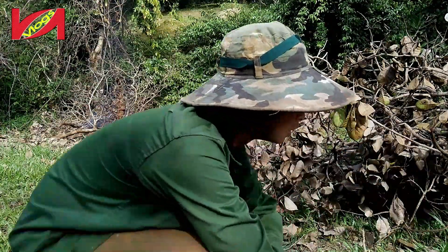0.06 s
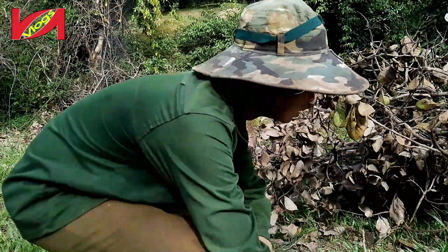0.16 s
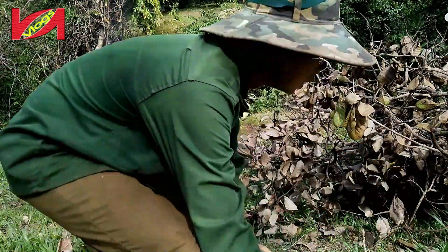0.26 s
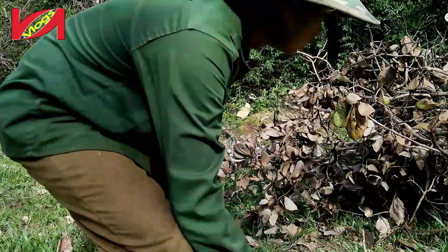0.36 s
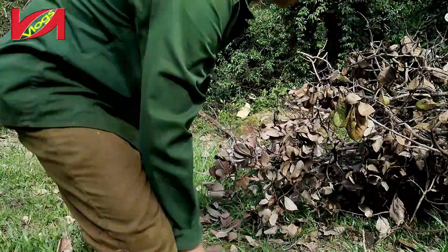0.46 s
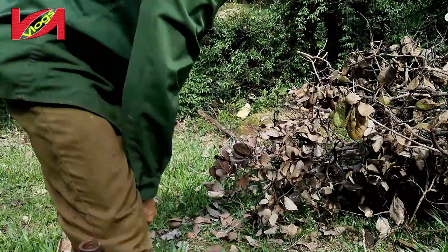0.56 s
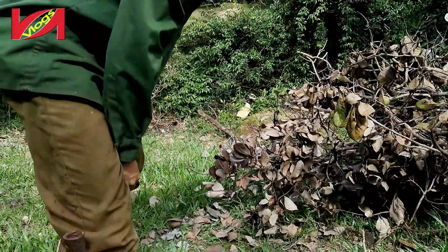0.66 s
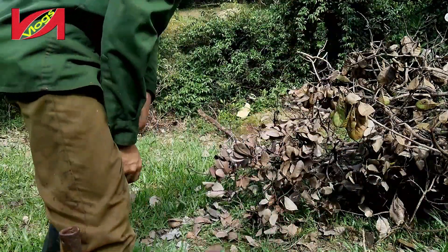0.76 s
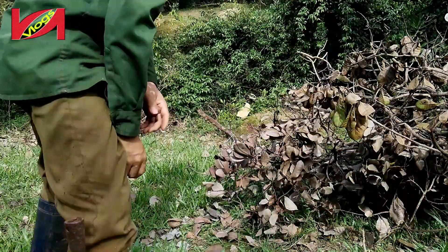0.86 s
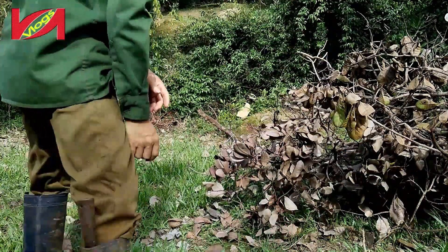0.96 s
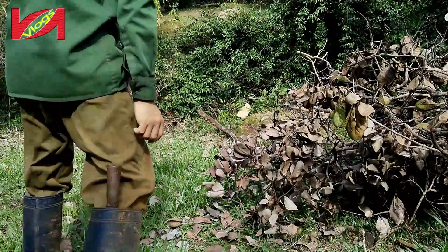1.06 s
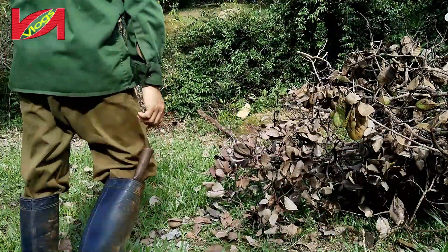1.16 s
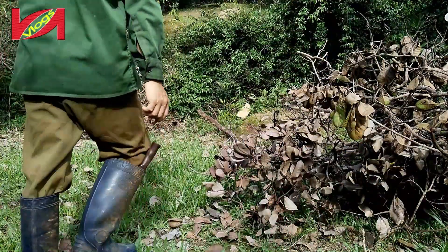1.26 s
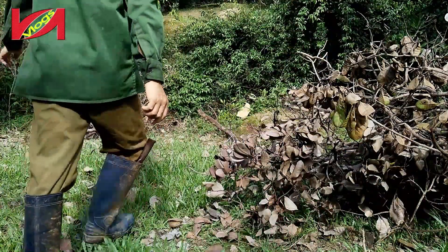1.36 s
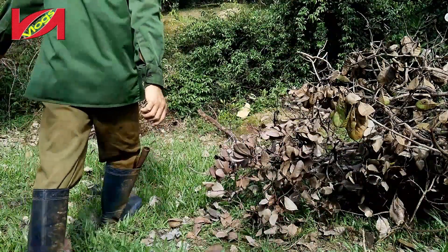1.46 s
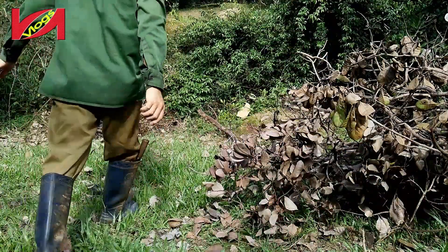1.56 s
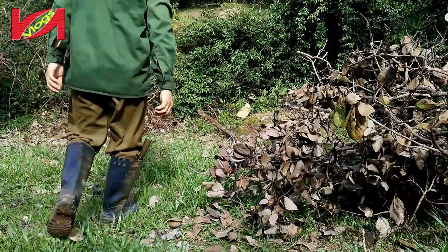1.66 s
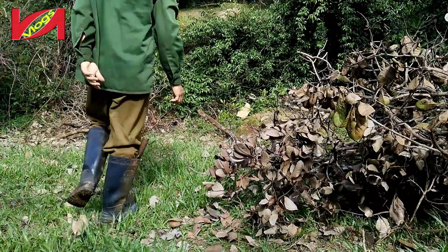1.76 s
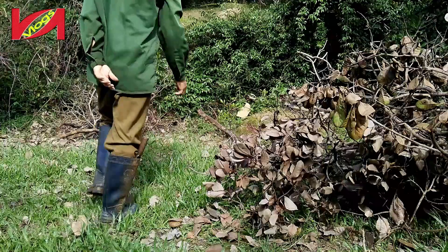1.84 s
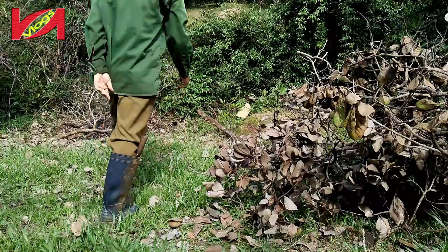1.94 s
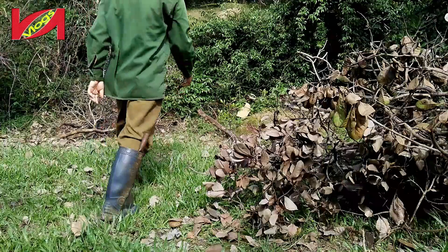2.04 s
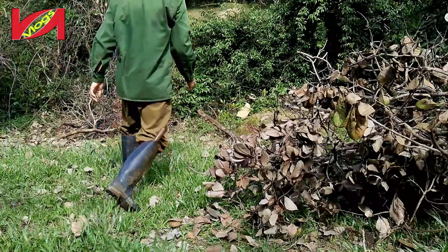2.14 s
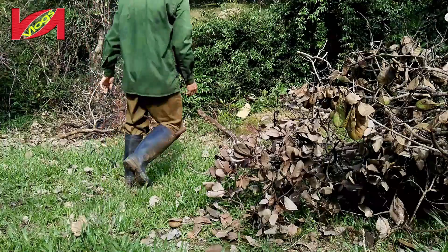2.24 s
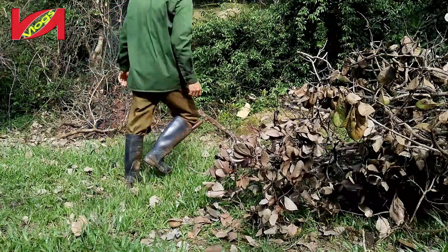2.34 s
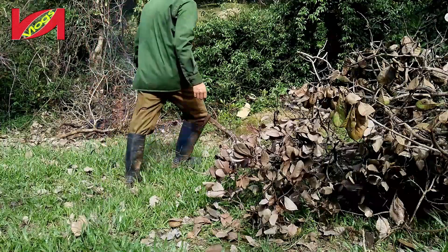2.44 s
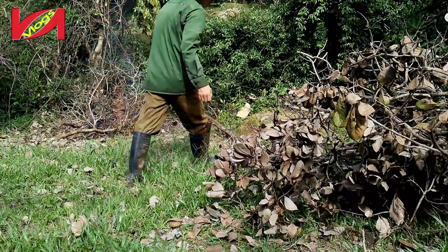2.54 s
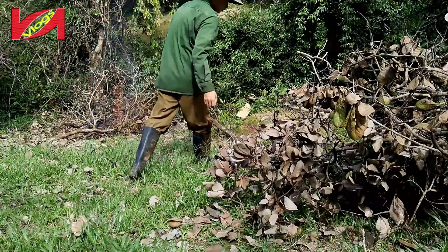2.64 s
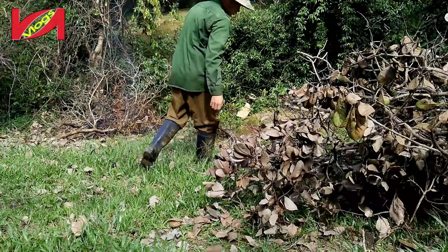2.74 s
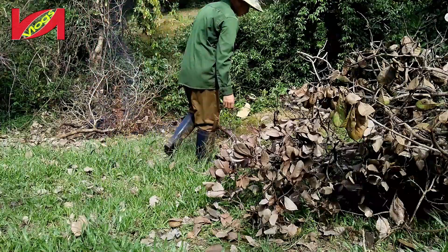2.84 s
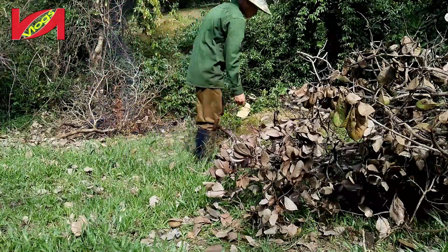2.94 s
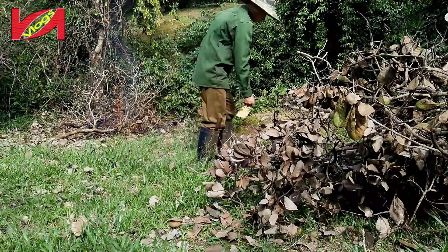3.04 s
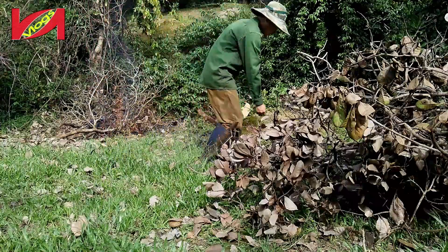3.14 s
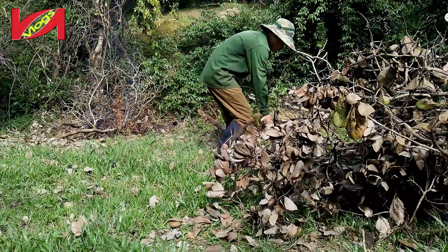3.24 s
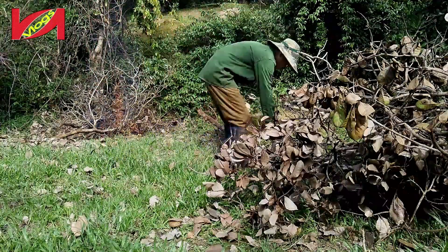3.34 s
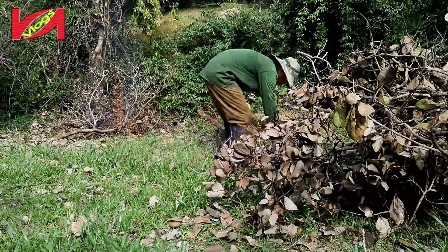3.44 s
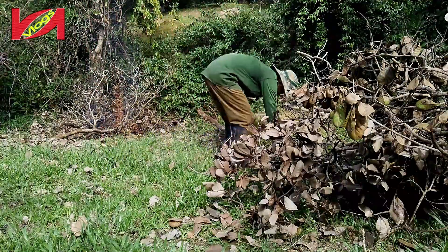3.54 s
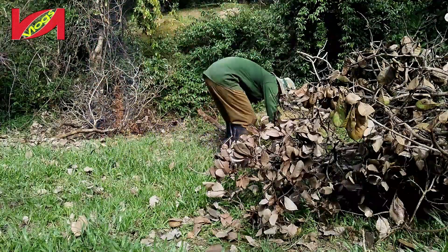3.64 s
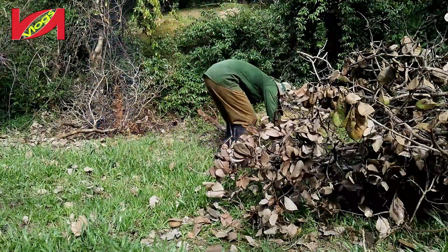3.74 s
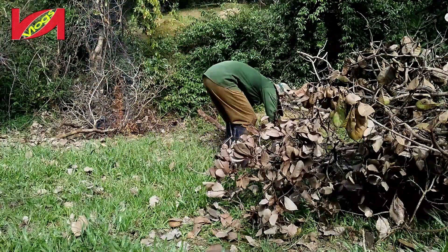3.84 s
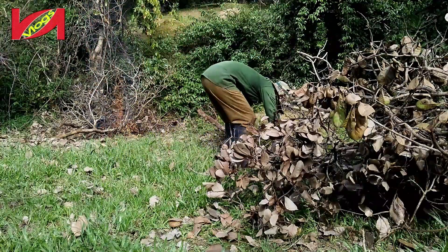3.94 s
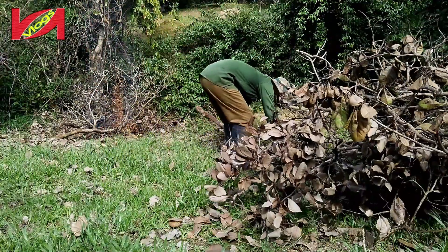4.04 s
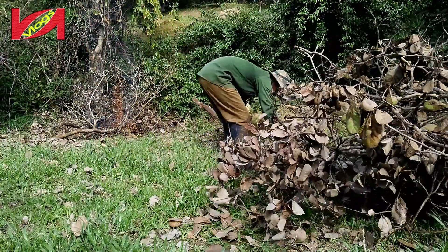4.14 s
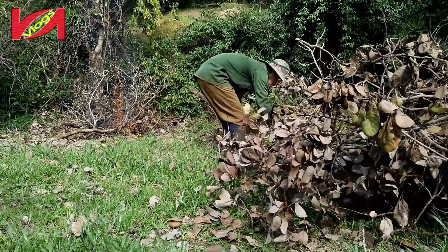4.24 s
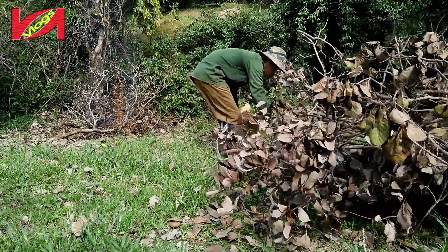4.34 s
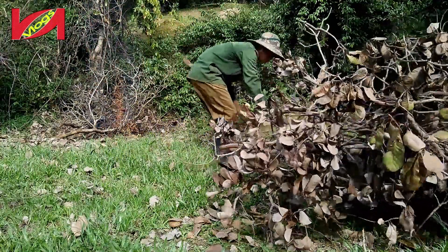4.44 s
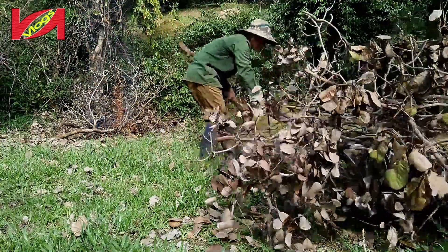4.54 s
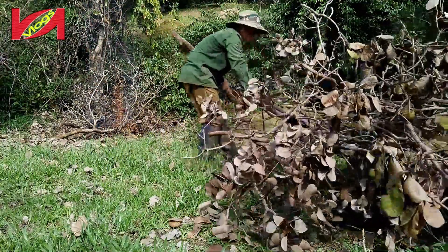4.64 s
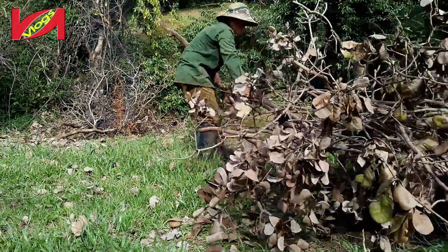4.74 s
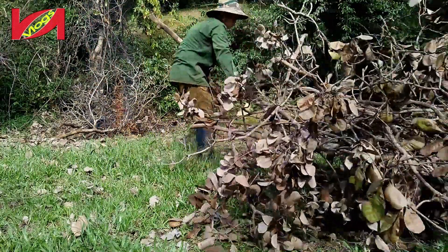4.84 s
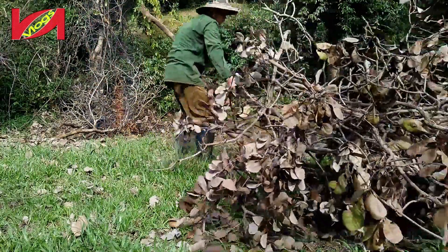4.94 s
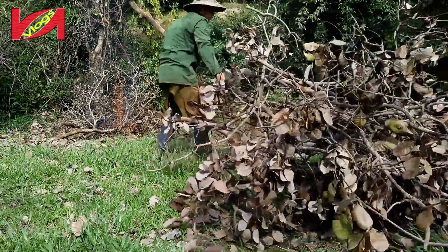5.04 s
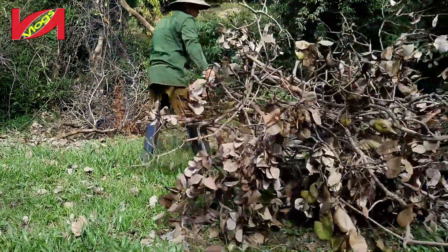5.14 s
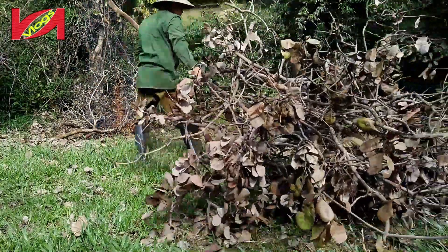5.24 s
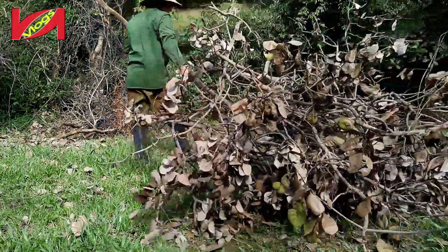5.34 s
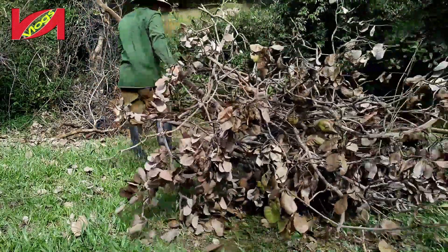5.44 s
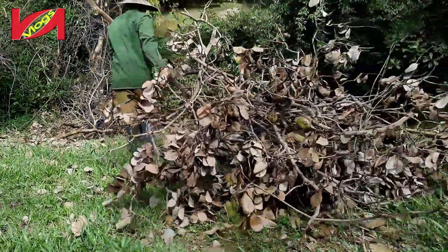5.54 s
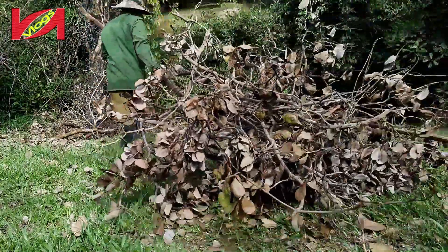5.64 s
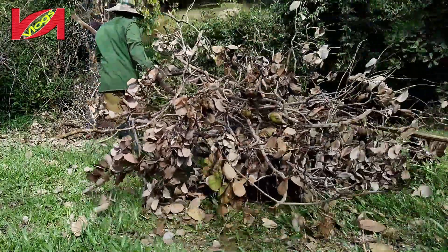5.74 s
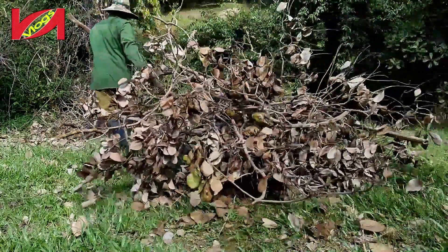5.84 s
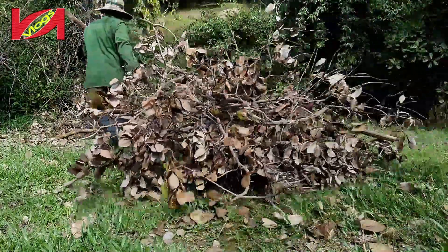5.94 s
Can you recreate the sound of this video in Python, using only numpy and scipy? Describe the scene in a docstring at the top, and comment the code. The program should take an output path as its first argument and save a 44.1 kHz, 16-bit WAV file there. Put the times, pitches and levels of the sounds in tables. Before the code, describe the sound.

Soft boot steps on grass, then dry leaves crackle and twigs snap loudly as a heap of branches is dragged, over faint bird chirps.

```python
"""First you hear a small bird repeating one chirp over a faint band of insects in a quiet orchard.
A worker in rubber boots walks over the grass: blades crackle, stems crunch and the soil thuds.
The worker takes hold of a heap of cut branches and drags it away, the loudest part of the scene.
Dry leaves crackle in dense clumps, twigs snap and splinter, and the boughs scrape over the ground."""
import sys
import numpy as np
from scipy import signal
from scipy.fft import rfft, irfft, next_fast_len
from scipy.io import wavfile
from scipy.ndimage import uniform_filter1d

SR = 44100
rng = np.random.default_rng(int(sys.argv[2]) if len(sys.argv) > 2 else 0)


def put_to_file(sound):
    """Save the sound as 16-bit audio at rate SR, in the file named by the first command-line argument."""
    columns = np.atleast_2d(sound).T  # one column per channel
    safe = np.clip(columns, -1, 1)
    whole_steps = np.round(safe * 32767)
    wavfile.write(sys.argv[1], SR, whole_steps.astype(np.int16))


N = 264159
TIME = np.arange(N) / SR

# The steady pull on the heap. Each row: time in seconds, rustle level in dB.
STEADY_DRAG = [(4.2, -56), (4.224, -48), (4.34, -41), (4.42, -46.5), (4.68, -40), (4.92, -37),
               (5.15, -30.5), (5.27, -24.5), (5.43, -27), (5.62, -23.5), (5.76, -32), (5.99, -28)]
# Tugs that shake the whole heap. Each row: peak time in seconds, rustle level in dB, fade in seconds.
HEAP_TUGS = [(4.454, -28.5, 0.0081), (4.527, -37, 0.045), (4.663, -22.5, 0.02), (4.777, -29, 0.049),
             (4.906, -29.5, 0.0066), (4.959, -27, 0.017), (5.029, -25, 0.022), (5.093, -25.5, 0.039),
             (5.315, -27, .022), (5.49, -22.5, 0.017), (5.704, -23.5, 0.014), (5.91, -26, 0.011)]
# The tone of dry leaves. Each row: frequency in Hz, level in dB.
LEAF_TONE = [(60, -25), (250, -21), (700, -13.5), (1800, -10), (3500, -5.5), (5000, -4), (7000, -7.5),
             (8800, -16), (10000, -18.5), (12300, -25.5), (14000, -38)]
# The low tone of boughs on the ground. Each row: frequency in Hz, level in dB.
SCRAPE_TONE = [(15, -46), (28, -25), (45, -4), (75, -1.5), (130, -4.5), (220, -5.5), (600, -5.5),
               (1200, -20.5), (3000, -32.5)]


def dragged_heap(wash_db=-2, crinkle_db=-4.5, scrape_db=-45, full_drag_db=-22, snag_db=2, recede_s=5.33):
    """Countless leaves rub into a wash, nearer ones crinkle singly, and boughs scrape below."""
    snags = snag_db * wander(per_s=25)  # the heap catches and frees itself as it slides
    drag = amp(np.interp(TIME, *np.transpose(STEADY_DRAG), left=-120) + snags)
    motion = np.sqrt(drag ** 2 + sum(swell(*tug) for tug in HEAP_TUGS))
    wash = crackle(LEAF_TONE, per_s=16000, spread_db=1.0, clump_db=1.5, clumps_per_s=70)
    leaves = amp(wash_db) * wash + amp(crinkle_db) * leaf_crinkle()
    treble = shaped(leaves, [(5500, -39), (7300, -0.5), (9000, 0.5)])
    crispness = amp(-12 * np.maximum(TIME - recede_s, 0))  # treble fades as the heap draws away
    scrape = amp(scrape_db) * (motion / amp(full_drag_db)) ** 0.83 * noise(SCRAPE_TONE)
    return motion * (leaves + (crispness - 1) * treble) + scrape


def leaf_crinkle(onset_s=0.000092, flutter_s=0.0013):
    """A buckling leaf flutters for about a millisecond, so each crinkle has a tone of its own."""
    sizes = random_clicks(per_s=360, spread_db=4, limit=2.4)
    t = np.arange(SR // 100) / SR
    flutter = np.exp(-t / flutter_s) * (1 - np.exp(-t / onset_s))
    power = signal.oaconvolve(sizes ** 2, flutter ** 2)[:N]
    bursts = rng.standard_normal((2, N)) * np.sqrt(abs(power))
    return unit(ring(bursts, LEAF_TONE, body_db=-2.5))


# Twigs breaking. Each row: start in seconds, level in dB, fade of the tearing in seconds,
# boost below about 4 kHz in dB, wooden knock compared with the snap in dB.
TWIG_BREAKS = [(1.2538, -37, 0.0075, -4.5, -32), (1.292, -50, 0.0027, -6, -25),
               (1.305, -44, 0.0037, -6, -28), (1.6605, -33.5, 0.0057, 3, -23),
               (2.6576, -19.5, 0.003, -14, -32), (2.9073, -45.5, 0.0026, -4, 4),
               (3.0608, -50, 0.0055, 2, -28), (3.2127, -34.5, 0.0052, -3, -15),
               (3.303, -44, 0.0053, -2, -27), (3.3345, -31.5, 0.0047, -2.5, -11),
               (3.8765, -27, 0.0034, -9.5, 1.5), (3.9559, -43, 0.0032, -5, 10.5),
               (4.0048, -22.5, 0.0028, -16.5, -19), (4.333, -18, 0.0035, -4.5, -3),
               (4.402, -27, 0.0025, -2, -30), (4.539, -22.5, 0.0022, 3, -30),
               (4.5832, -7.5, 0.0046, -6.5, -10.5), (4.644, -5.5, 0.012, 3, -32),
               (5.031, -14, 0.0022, -10, -30), (5.1719, -2.5, 0.0072, -2.5, -6),
               (5.183, -9.5, 0.0025, -19, -14), (5.305, -16, 0.0021, -8, -30),
               (5.316, -11.5, 0.0061, -5, -30), (5.338, -17, 0.0024, -7, -30),
               (5.6938, -7, 0.0043, 2.5, -24)]
# The bright tone of a breaking twig. Each row: frequency in Hz, level in dB.
TWIG_TONE = [(100, -16), (700, -10.5), (2000, -3), (4000, 3), (6500, 1.5), (9000, -6.5), (11000, -14),
             (14000, -19)]


def snapping_twigs(crack_s=0.0007, fibres_per_s=11000, knock_hz=420, knock_s=0.00019):
    """A twig gives with one crack and a knock of wood, and its fibres tear in a dying shower."""
    full_tear_s = 0.0076  # a tear this long peaks as high as its crack; shorter ones are weaker
    out, t = np.zeros((2, N)), np.arange(SR // 8) / SR
    knock = np.sin(2 * np.pi * knock_hz * t) * np.exp(-t / knock_s)
    for s, db, tear_s, body_db, knock_db in TWIG_BREAKS:
        burst = rng.standard_normal((2, len(t))) * np.exp(-t / crack_s)
        crack = ring(burst, TWIG_TONE, body_db)
        fibres = rng.standard_normal((2, len(t))) * (rng.random(len(t)) < fibres_per_s / SR)
        tearing = np.exp(-t / tear_s) * (1 - np.exp(-t / crack_s))
        shower = ring(fibres * tearing, TWIG_TONE, body_db)
        snap = unit_peak(crack) + tear_s / full_tear_s * unit_peak(shower)
        add(out, s, amp(db) * (unit_peak(snap) + amp(knock_db) * knock))
    return out


def ground_echo(x, echo_db=-17, decay_s=0.014):
    """Ground and foliage throw back a faint, very short tail."""
    t = np.arange(SR // 6) / SR
    bounces = rng.standard_normal((2, len(t))) * np.exp(-t / decay_s) * (t > .003)
    tail = signal.oaconvolve(x, bounces / np.linalg.norm(bounces[0]), axes=1)[:, :N]
    return x + amp(echo_db) * tail


# Boots landing on or swinging through grass.
# Each row: peak time in seconds, rustle level in dB, fade in seconds, thud level in dB.
BOOT_STEPS = [(1.057, -59, 0.0051, -49), (1.197, -67, 0.018, -68.5), (1.258, -59.5, 0.017, -71),
              (1.333, -59, 0.012, -75.5), (1.641, -44, 0.022, -58.5), (1.67, -57, 0.0071, -53),
              (1.837, -60.5, .018, -71.5), (1.893, -60.5, 0.01, -84), (2.158, -55.5, 0.021, -67),
              (2.23, -60.5, 0.018, -75), (2.367, -57, 0.021, -75), (2.606, -47.5, 0.0097, -63),
              (2.636, -30.5, 0.006, -49), (2.654, -29.5, 0.015, -61), (2.703, -43.5, 0.025, -56),
              (2.757, -55.5, 0.011, -64)]
# Hands reaching into the leaves. Each row: peak time in seconds, rustle level in dB, fade in seconds.
HAND_GRABS = [(3.224, -49, 0.039), (3.258, -48.5, .015), (3.365, -57.5, 0.027), (3.44, -49.5, 0.014),
              (3.471, -49.5, 0.019), (3.519, -49, 0.014), (4.031, -59, 0.022), (4.16, -51.5, .016)]
# The tone of rustling grass. Each row: frequency in Hz, level in dB.
GRASS_TONE = [(60, -32), (250, -26), (700, -13), (1800, -17.5), (3500, -7), (5000, -4), (7000, -8),
              (8800, -17), (10500, -17), (12300, -26), (14000, -37)]
# The dull tone of a thud on soil. Each row: frequency in Hz, level in dB.
SOIL_TONE = [(25, -20), (70, -2.5), (250, 2), (450, -2), (850, -9), (1400, -21), (4000, -35), (12000, -55)]


def boots_and_hands(stems_db=-3, bump_db=-17):
    """Boots and hands make blades crackle; their weight crunches stems and thuds on the soil."""
    grabs = [(s, db, fade, db + bump_db) for s, db, fade in HAND_GRABS]  # boughs bump under the hands
    strokes = BOOT_STEPS + grabs
    rustle = sum(swell(s, db, fade) for s, db, fade, _ in strokes)
    thud = sum(swell(s, db, fade) for s, _, fade, db in strokes)
    blades = crackle(GRASS_TONE, per_s=6000, spread_db=1.5, clump_db=2.5, clumps_per_s=200)
    stem_tone = [(150, -44), (500, -6), (1100, 1.5), (2000, 1), (4000, -34), (12000, -45)]
    stems = crackle(stem_tone, per_s=1300, spread_db=2.5, clump_db=8.5, clumps_per_s=140)
    crushed = np.minimum(thud, rustle)  # stems crunch only where the weight lands on plants
    crunch = amp(stems_db) * stems * np.sqrt(crushed)
    return blades * np.sqrt(rustle) + crunch + noise(SOIL_TONE) * np.sqrt(thud)


# The small bird's calls. Each row: peak time in seconds, level in dB before the boost.
BIRD_CHIRPS = [(.15, -64), (.516, -60.5), (.883, -62), (1.192, -58.5), (1.519, -60.5), (1.794, -61),
               (2.081, -61), (2.357, -58), (2.955, -57.5), (3.588, -60), (3.89, -57), (4.15, -55)]


def bird(boost_db=1, pitch_hz=4400, arch_hz=240, note_s=0.014, rasp=0.14, direct_db=-3, echo_s=0.009):
    """A short raspy chirp rises and falls in pitch, smeared by echoes from the trees."""
    out, t = np.zeros((2, N)), np.arange(SR // 4) / SR
    from_peak = t / note_s - 2
    pitch = pitch_hz + arch_hz * (.5 - np.minimum(from_peak ** 2, 2))
    for s, db in BIRD_CHIRPS:
        drift = rasp * np.cumsum(uniform_filter1d(rng.standard_normal(len(t)), size=30))
        note = np.exp(-from_peak ** 2) * np.sin(2 * np.pi * np.cumsum(pitch) / SR + drift)
        trees = rng.standard_normal((2, len(t))) * np.exp(-t / echo_s)
        echo = signal.fftconvolve(note[None], trees / np.linalg.norm(trees[0]), axes=1)[:, :len(t)]
        call = amp(direct_db) * note + echo
        add(out, s - 2 * note_s, amp(db + boost_db) * unit_peak(call))
    return out


def far_bird(peak_s=0.25, fade_s=0.028, db=-73, hz=4650, width_hz=130):
    """One longer bird note from deep in the trees, blurred into a narrow band of noise."""
    tone = [(hz - 4 * width_hz, -60), (hz - width_hz, -4), (hz, 0),
            (hz + width_hz, -4), (hz + 4 * width_hz, -60)]
    return amp(db) * noise(tone) * np.exp(-((TIME - peak_s) / fade_s) ** 2)


# The high tone of the insects. Each row: frequency in Hz, level in dB.
INSECT_TONE = [(3700, -18), (4400, -1.5), (4700, -2), (5050, -5.5), (5500, -0.5), (6000, 0), (6250, -4),
               (6750, -0.5), (7200, -15), (8500, -26)]


def insects(db=-76, waver_db=2.5):
    """Far insects blend into one high, wavering hum."""
    return amp(db) * noise(INSECT_TONE) * amp(-waver_db * wander(per_s=24.2))


# The tone of the orchard air. Each row: frequency in Hz, level in dB.
AIR_TONE = [(10, -12), (32, -18), (48, -3.5), (80, 0), (130, -6), (300, -15), (700, -19.5), (3500, -21),
            (7500, -24.5), (10000, -26.5), (14000, -27.5)]


def still_air(db=-74):
    """Still air gives a low rumble and a faint hiss."""
    return amp(db) * noise(AIR_TONE)


def crackle(tone, per_s, spread_db, clump_db, clumps_per_s):
    """Tiny breaks come in quick clumps, as one leaf after another gives way under a steady load."""
    clicks = random_clicks(per_s, spread_db, limit=5.6) * rng.choice([-1., 1.], (2, N))
    grains = ring(clicks * amp(clump_db * wander(clumps_per_s)), tone)
    local_power = uniform_filter1d((grains ** 2).mean(0), size=1000)
    return grains / np.sqrt(local_power + 1e-9)


def random_clicks(per_s, spread_db, limit):
    """Clicks at random moments: many small, a few large."""
    sizes = amp(spread_db * np.minimum(rng.exponential(1, N), limit))
    return sizes * (rng.random(N) < per_s / SR)


def ring(clicks, tone, body_db=0, peak_hz=5880, width_hz=540, peak_db=12.0):
    """Gives clicks a tone, with a short, bright ring on top."""
    hz = np.fft.rfftfreq(2048, 1 / SR)
    body = body_db / (1 + (hz / 4300) ** 8)
    peak = peak_db / (1 + ((hz - peak_hz) / width_hz) ** 2)
    db = level_at(tone, hz) + body + peak
    log_gain = np.log(amp(np.r_[db, db[-2:0:-1]]))
    spectrum = np.exp(np.conj(signal.hilbert(log_gain)))  # rings only after the click, never before
    response = np.fft.ifft(spectrum).real[:len(hz)]
    return signal.oaconvolve(clicks, response[None], axes=1)[:, :clicks.shape[1]]


def swell(peak_s, db, fade_s, rise_share=0.71):
    """The power of one stroke: it grows a little faster than it dies away."""
    from_peak = np.maximum((peak_s - TIME) / rise_share, TIME - peak_s)
    return amp(db) ** 2 * np.exp(-2 * np.minimum(from_peak / fade_s, 20))


def wander(per_s):
    """A random curve that turns about per_s times a second."""
    points = rng.standard_normal(N // 16)
    return unit(np.interp(TIME * per_s, np.arange(len(points)), points))


def noise(tone):
    """Two rows of noise with the given tone."""
    return unit(shaped(rng.standard_normal((2, N)), tone))


def shaped(x, tone):
    """Filters a whole track to give it a tone."""
    size = next_fast_len(N + 4096)
    gain = amp(level_at(tone, np.fft.rfftfreq(size, 1 / SR)))
    return irfft(rfft(x, size) * gain, size)[..., :N]


def level_at(tone, hz):
    """Looks up dB between the rows of a tone table."""
    row_hz, row_db = np.transpose(tone)
    return np.interp(np.log(hz + 1), np.log(row_hz + 1), row_db)


def amp(db):
    """Turns decibels into a multiplier."""
    return 10 ** (np.asarray(db) / 20)


def unit(x):
    """Scales to an average power of one."""
    return x / np.sqrt(np.mean(x ** 2) + 1e-20)


def unit_peak(x):
    """Scales so the first row peaks at one."""
    return x / abs(x[0]).max()


def add(mix, s, sound):
    """Mixes a sound in at s seconds."""
    part = mix[:, round(s * SR):][:, :sound.shape[-1]]
    part += sound[..., :part.shape[-1]]


def set_width(x, side_db):
    """Makes a sound wider (above 0 dB) or narrower (below)."""
    return x * np.array([[1], [amp(side_db)]])


# How much left and right differ. Each row: frequency in Hz, level of the difference in dB.
STEREO_WIDTH = [(3600, -75), (4300, -26), (5200, -15), (6800, -13), (7600, -9), (8600, -5.5), (12000, -6),
                (14000, -9)]


def scene():
    """Mixes two rows: mid is what left and right share, side is how they differ, only in the treble."""
    work = set_width(boots_and_hands(), side_db=1.5) + dragged_heap()
    twigs = set_width(ground_echo(snapping_twigs()), side_db=-44)
    orchard = set_width(still_air() + insects(), side_db=3.5)
    mid, side = work + twigs + orchard + bird() + far_bird()
    side = shaped(side, STEREO_WIDTH)
    return np.array([mid + side, mid - side])


def record(dry):
    """Cuts the highest treble, above 14350 Hz."""
    lowpass = signal.firwin(255, 14350, window=("kaiser", 8), fs=SR)
    return signal.oaconvolve(dry, lowpass[None], "same", axes=1)


dry = scene()
out = record(dry)
put_to_file(out)
```